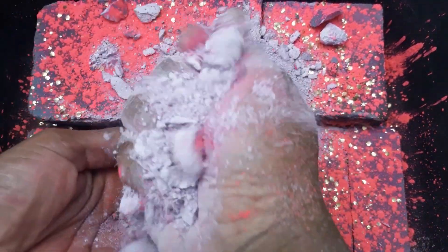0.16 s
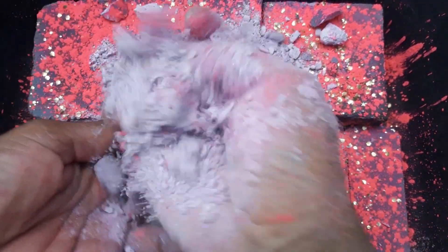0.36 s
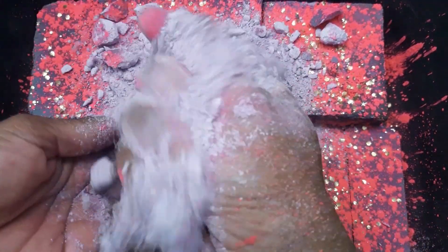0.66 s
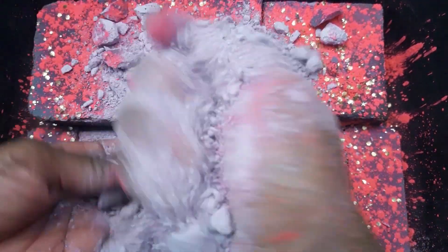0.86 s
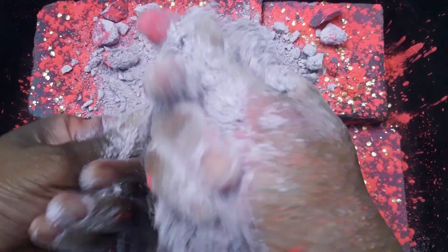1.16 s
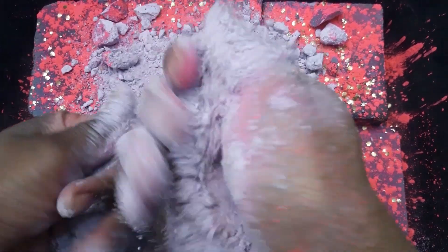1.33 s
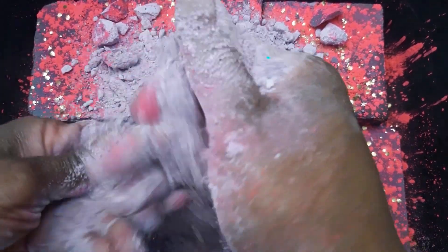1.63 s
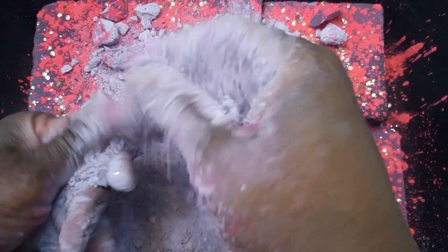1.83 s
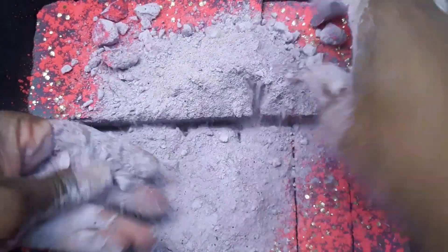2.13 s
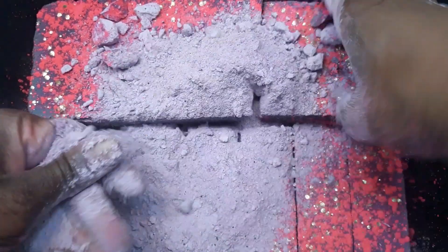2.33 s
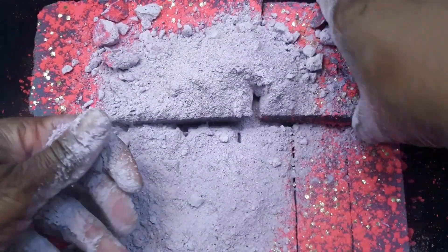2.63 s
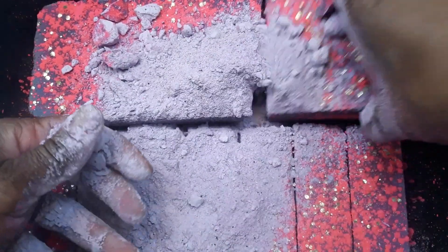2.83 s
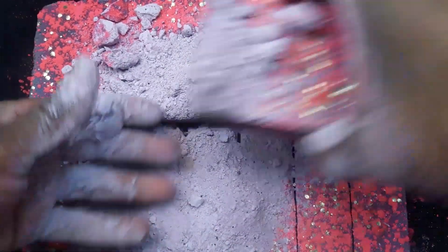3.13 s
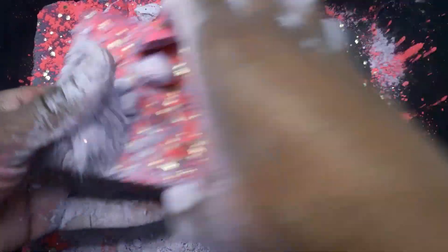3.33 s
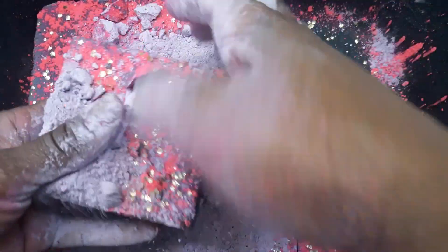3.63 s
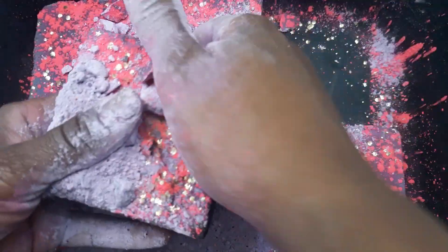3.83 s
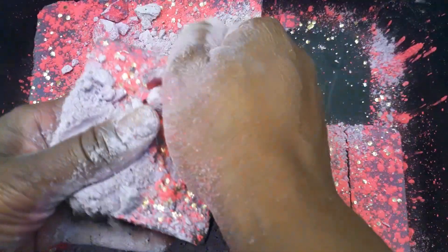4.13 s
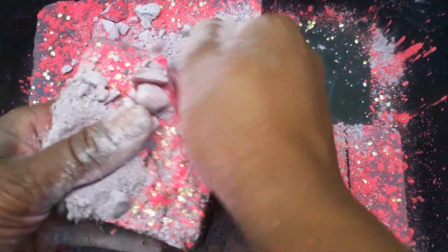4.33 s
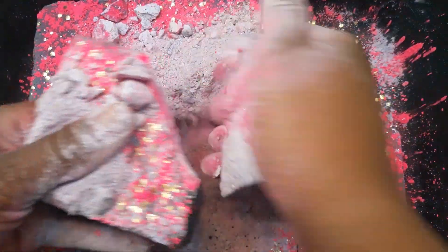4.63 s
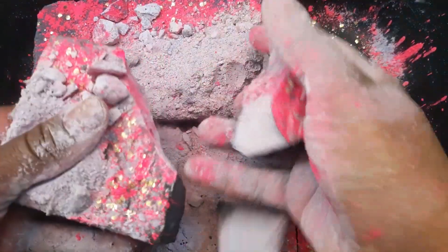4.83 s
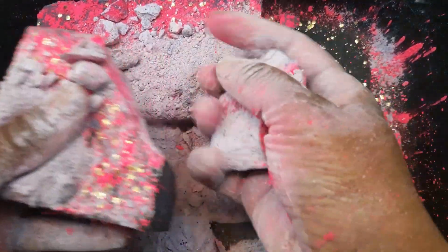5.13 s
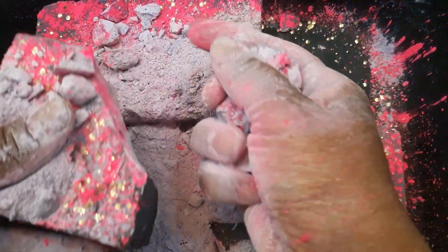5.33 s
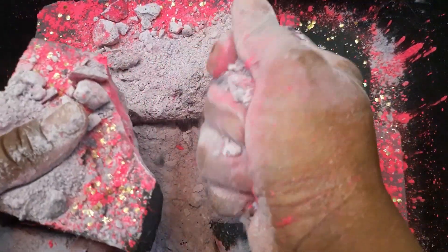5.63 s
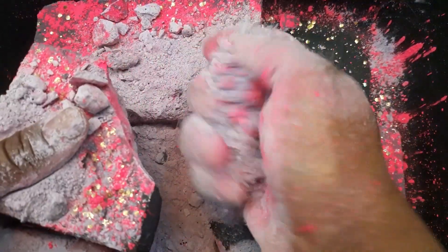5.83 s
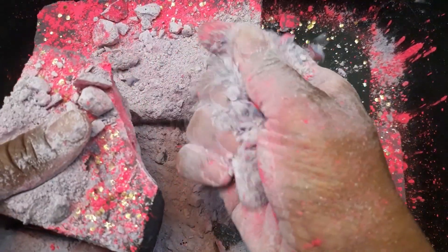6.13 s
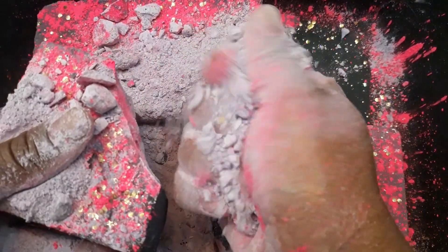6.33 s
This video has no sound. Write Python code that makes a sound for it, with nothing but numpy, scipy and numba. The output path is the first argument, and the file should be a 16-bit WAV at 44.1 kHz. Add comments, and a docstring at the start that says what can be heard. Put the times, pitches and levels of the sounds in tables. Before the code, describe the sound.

A close, dry capture in a quiet room with barely audible air and mains hum. From 0 s chalk is squeezed in the hands with small brittle snaps and gritty, crumbly rustle, swelling into a tight cluster of loud cracks and hollow knocks around 0.8-0.95 s. Scattered crumbling snaps and soft thumps continue to about 1.6 s, then thin to powdery rubbing. At 2.25-2.3 s lumps hit the tray with the heaviest low clunk and a coarse scrape. Tray rumble, short gritty drags and cracks follow until 3 s. From 3.2 to 4 s it is quiet, with faint dry scrapes. Crisp snaps burst at 4.2-4.3 s, then a lull. At 4.8 s crunching resumes, with irregular bright cracks from 5.2 to 5.7 s, a brief easing, then very sharp snaps at 6.07 and 6.2 s, and grit and smaller cracks to the end.

```python
"""Dry chalk bars snap, crush and crumble in the hands: noise pushed through resonances cracks, lumps knock.
Lumps thump the tray, whose decaying sines boom; uneven clicks over noise make grit, dust, crumb patter and rumble.
A dragged bar turns dense stick-slip clicks into wandering modes above a coarser crunch.
Shaped noise for room air and a wavering mains hum lie faintly underneath."""
import sys
import numpy as np
from scipy import signal
from scipy.fft import rfft, irfft
from scipy.io import wavfile
from scipy.ndimage import uniform_filter1d
from numba import njit

SR = 44100
rng = np.random.default_rng(int(sys.argv[2]) if len(sys.argv) > 2 else 0)


def pcm_store(signal):
    """Save signal as 16-bit PCM."""
    levels = np.round(np.clip(np.atleast_2d(signal), -1, 1) * 32767)
    wavfile.write(sys.argv[1], SR, levels.astype(np.int16).T)


N = 286209

# room air spectrum: f/Hz, gain/dB
AIR_SHAPE = [(15, -51.5), (25, -15), (135, -3), (388, -26), (875, -7), (1390, -27.5), (1550, -2),
             (1770, -37), (2330, -19), (4110, -15.5), (8560, -32.5), (15100, -30), (16400, -44)]
AIR_RMS_DB = -69.5
HUM_HZ, HUM_PEAK_DB = 120, -61  # hum level wavers about this

# steady working of the powder: t/s, grit/dB, fine dust/dB, crumb patter/dB, tray rumble/dB
STEADY_WORK = [(0.0, -46, -53, -34.5, -61), (0.23, -55, -66, -53.5, -51.5), (0.92, -45, -54.5, -43.5, -62),
               (2.04, -63.5, -73, -66, -57), (2.28, -50, -64, -63, -48), (2.44, -52, -89, -53, -32.5),
               (2.709, -76, -81, -53, -29), (2.86, -37.5, -68, -42, -42), (3.11, -77, -93, -76, -60.5),
               (3.89, -64.5, -60, -77, -67.5), (4.051, -48.5, -71, -54, -49), (4.23, -56.5, -73, -53, -52),
               (4.43, -61.5, -87, -84, -63), (4.59, -63.5, -75, -76, -65), (5.39, -47.5, -63, -51, -43.5),
               (5.87, -49, -68, -49.5, -42.5), (6.11, -45.5, -53.5, -43, -38), (6.49, -60, -70, -56, -47)]
# squeezes and shoves: peak t/s, rise/s, fall/s, grit/dB, fine dust/dB, crumb patter/dB, tray rumble/dB
SQUEEZES = [(0.03, 0.13, 0.1, -60, -66, -49, -30.5), (0.31, 0.035, 0.072, -47.5, -49, -55, -72),
            (0.43, 0.073, 0.11, -47, -55, -40.5, -43.5), (0.509, 0.048, 0.048, -37.5, -46.5, -41.5, -41),
            (0.689, 0.2, 0.033, -44, -60, -38, -40), (0.91, 0.11, 0.12, -33, -62, -38, -25),
            (1.1, 0.061, 0.2, -52, -75, -48, -47), (1.6, 0.32, 0.21, -51.5, -65, -44, -40),
            (1.732, 0.084, 0.2, -44, -52.5, -43.5, -63), (2.149, 0.3, 0.22, -46.5, -57.5, -49.5, -49),
            (2.296, 0.039, 0.16, -37.5, -50, -24, -17.5), (2.688, 0.1, 0.068, -41, -54, -38.5, -18),
            (2.855, 0.09, 0.056, -38, -41, -28.5, -33.5), (2.986, 0.036, 0.11, -42, -58, -39.5, -42),
            (3.382, 0.088, 0.31, -58.5, -53.5, -78, -72.5), (3.645, 0.11, 0.092, -81.5, -83, -46.5, -36),
            (4.035, 0.18, 0.22, -57, -58, -72, -67), (4.281, 0.05, 0.13, -57, -50, -40, -34),
            (4.392, 0.083, 0.064, -51.5, -55.5, -64.5, -45), (4.793, 0.0052, 0.043, -38, -56, -47, -27.5),
            (4.91, 0.032, 0.08, -47, -45, -38, -25.5), (5.66, 0.15, 0.07, -49, -53, -57, -56),
            (6.04, 0.36, 0.026, -47.5, -69, -62, -54), (6.214, 0.046, 0.16, -34.5, -60, -38, -41.5),
            (6.474, 0.084, 0.065, -38, -53, -39, -33)]
SWELL_DB = 20  # climb over the rise, drop over the fall
# rubbed grit spectrum: f/Hz, gain/dB
GRIT_SHAPE = [(1000, -26.5), (1700, -10.5), (1890, 1.5), (2320, 3), (3850, 4.5), (5120, 0.5), (6210, 0),
              (8000, -24), (10400, -44.5), (17600, -120)]
# fine dust spectrum: f/Hz, gain/dB
DUST_SHAPE = [(4120, -24.5), (7000, 1.5), (7930, 1), (12100, -18.5), (15200, -24), (16400, -44)]
# crumb patter spectrum: f/Hz, gain/dB
CRUMB_SHAPE = [(180, -25.5), (300, -11), (379, -16), (511, -2.5), (613, -7.5), (747, -10.5), (887, -15.5),
               (1480, -14), (1880, -24), (3380, -38.5), (5720, -120)]
# tray rumble spectrum: f/Hz, gain/dB
TRAY_SHAPE = [(15, -62), (25, -2), (64, -12), (84, 1), (120, -2.5), (173, 1), (200, 0), (252, -10.5),
              (333, -5), (375, -17.5), (450, -25), (580, -39.5), (990, -120)]

# lumps on the tray: t/s, peak/dB, boom f/Hz, ring T60/s (floored in thumps)
THUMPS = [(0.028, -29.5, 250, 0.11), (0.795, -10.5, 209, 0.036), (0.867, -10, 265, 0.049),
          (0.893, -6.5, 162, 0.12), (1.272, -22.5, 153, 0.15), (1.492, -25.5, 154.7, 0.17),
          (1.548, -13.5, 265, 0.043), (2.256, -15, 97, 0.12), (2.262, 0.5, 170, 0.08),
          (2.278, -5.5, 165, 0.12), (2.294, 0, 164, 0.069), (2.383, -12, 182, 0.11),
          (2.548, -15, 169.6, 0.13), (2.679, -23.5, 173, 0.44), (2.719, -20, 196.3, 0.21),
          (2.764, -20, 158, 0.13), (2.819, -23, 134, 0.11), (3.624, -26.5, 147, 0.15),
          (4.173, -29, 125, 0.045), (4.268, -12, 162, 0.0078), (4.793, -22.5, 122, 0.13),
          (4.892, -15, 249.4, 0.11), (5.215, -42.5, 145, 0.066), (5.265, -26, 108, 0.074),
          (5.329, -28.5, 91.5, 0.027), (5.378, -18.5, 118, 0.053), (5.411, -25, 114, 0.063),
          (5.527, -28, 124, 0.068), (5.855, -32.5, 170, 0.27), (6.053, -19.5, 113, 0.055)]

# fractures: t/s, fragment snap peak/dB, fragment f/Hz, lump knock/dB, brittle edge re snap/dB
CRACKS = [(0.0412, -16, 1340, -18, -34), (0.059, -25, 3670, -33, -24), (0.0861, -25.5, 3250, -36, -1),
          (0.3067, -30, 3850, -51, -24), (0.14, -30, 4000, -34, -24), (0.444, -22, 4000, -44, -24),
          (0.489, -14.5, 3000, -40, -27), (0.499, -17.5, 3800, -42, -13), (0.5092, -25.5, 1930, -32, -24),
          (0.55, -25, 1540, -55, -22), (0.6237, -24, 3700, -36, -26), (0.696, -35.5, 5600, -49, 0),
          (0.783, -22.5, 890, -26, -24), (0.8043, -27, 970, -16.5, -24), (0.823, -12.5, 5500, -29, -32),
          (0.8422, -17, 4050, -36, -19), (0.863, -4, 865, -13, -28), (0.866, 2, 1820, -13.5, -34),
          (0.8843, -3.5, 960, -16, -22), (0.9465, -30, 890, -24, 8), (1.0195, -19.5, 3650, -39, -31),
          (1.0763, -37, 2610, -36, -24), (1.0959, -29, 1550, -29, -24), (1.105, -29, 2600, -32, -24),
          (1.12, -23, 2410, -29.5, -24), (1.15, -23.5, 2360, -28, -2), (1.2572, -21, 3300, -34, -16),
          (1.2696, -25.5, 980, -61, 6), (1.3914, -26.5, 5530, -43, -3), (1.4057, -19, 1570, -21, -3),
          (1.478, -27, 1990, -27.5, -8), (1.512, -27, 1260, -28.5, -24), (1.5395, -20, 890, -11.5, -4),
          (1.562, -20, 940, -27.5, -31), (2.175, -27, 3520, -39, -21), (2.2473, -11, 1440, -41, -31),
          (2.6632, -22, 1280, -34, -28), (2.794, -18, 3760, -33, -3), (2.8013, -6.5, 2550, -29, -13),
          (2.882, -21, 5000, -50, -15), (2.937, -29.5, 1090, -37.5, -24), (2.961, -32, 4150, -55, -25),
          (2.9763, -17, 4300, -48, -36), (2.993, -15, 943, -41, -36.5), (3.2263, -36, 2960, -65.5, -26),
          (3.387, -30, 4960, -59, -25.5), (3.684, -29, 2660, -49, -20), (4.061, -19, 2600, -43.5, -12),
          (4.077, -26, 3500, -47, -26), (4.095, -16, 2820, -31, -16), (4.128, -23, 2870, -40, -26),
          (4.15, -26, 3010, -59, -24), (4.1807, -19.5, 2400, -46, -30), (4.2211, -6, 5730, -18.5, -17),
          (4.2238, -12.5, 4500, -21, -20), (4.2672, -3, 2730, -20, -3), (4.2877, -11.5, 3930, -27, -21),
          (4.5982, -49.5, 895, -45, -24), (4.79, -22, 3960, -46, -32), (4.8554, -29, 4100, -51, -27),
          (4.8622, -23.5, 4380, -53, -26), (4.8896, -24.5, 890, -18.5, 9.5),
          (4.8959, -12.5, 3620, -18.5, -24), (4.972, -27.5, 3140, -35, -27), (5.005, -28, 3630, -45, -17),
          (5.127, -28, 4870, -63, -27), (5.1668, -27, 6100, -48, -1), (5.2077, -19.5, 4670, -55, -20),
          (5.2167, -19.5, 4730, -36, -38), (5.2672, -9, 4250, -29.5, -14), (5.305, -28.5, 2400, -49, -13),
          (5.3348, -19.5, 3630, -57, -30), (5.3765, -7.5, 2280, -25, -35),
          (5.4072, -18.5, 1490, -28.5, -29), (5.4389, -13, 5700, -37, -27), (5.46, -23, 2200, -34.5, -22),
          (5.5395, -19.5, 2770, -29, -29), (5.5632, -21.5, 4530, -47, -24), (5.5778, -30, 2850, -36.5, -23),
          (5.6, -26, 2090, -56, -24), (5.6459, -8.5, 3900, -28, -15), (5.659, -12.5, 4230, -42, -45),
          (5.67, -19, 4600, -33.5, -30), (5.8555, -20.5, 850, -23.5, -28), (5.93, -26.5, 1320, -50, -27),
          (6.0528, -23, 1500, -29, -34), (6.0686, 0.5, 4660, -36, -22), (6.0816, -13, 4610, -50, -26),
          (6.099, -15, 3600, -28, -24), (6.1373, -12, 5200, -32.5, -3.5), (6.156, -26, 4500, -45, -24),
          (6.1756, 2, 3900, -16.5, -29), (6.2011, 1.5, 3760, -18, -29), (6.327, -9, 4540, -41, -32),
          (6.4063, -19, 3570, -32.5, -26), (6.4319, -12.5, 4400, -23.5, -34), (6.4494, -25, 2180, -52, -24),
          (6.458, -17, 3670, -43, -27), (6.4671, -15.5, 4010, -50, -35)]
# knock modes of a lump: f/Hz, width/Hz, level re knock/dB
LUMP_MODES = [(495, 101, -0.5), (640, 222, -1.5)]
# soft chalk radiates little extreme treble: f/Hz, gain/dB
CHALK_SHAPE = [(200, 3.5), (600, 2), (5000, -3), (7000, -8), (10000, -19.5), (14000, -42.5), (18000, -51.5)]
# fragment ring T60 at 2500 Hz, its fall with pitch, its random spread
RING_T60_S, RING_SLOPE, RING_SPREAD_DB = 0.017, 0.22, 2.5
KNOCK_T60_S, KNOCK_LAG_S = 0.02, 0.001988
EDGE_HZ, EDGE_WIDTH_HZ, EDGE_T60_S, EDGE_TOP_HZ = 4900, 3300, 0.011, 9400
# small fractures: weakest peak re grit gain, range above that, pitch limits
CRACKLE_PER_S, CRACKLE_DB, CRACKLE_SPREAD_DB = 130, 7, 6.5
CRACKLE_LOW_HZ, CRACKLE_HIGH_HZ = 1820, 6840
TAIL_T60_S, TAIL_DB = 0.19, -15.5

# dragged bar: start t/s, end t/s, rise/s, bar ring at start/dB, at end/dB,
# coarse crunch at start/dB, at end/dB, upper modes re ring/dB, pitch shift by the grip/semitones
SLIDES = [(1.702, 1.87, 0.034, -62, -59, -58, -58, 12, -0.1),
          (2.248, 2.346, 0.0015, -22.5, -33, -17, -29.5, -16.5, 0.9),
          (2.504, 2.644, 0.026, -48, -50, -36.5, -39.5, -7, 1.5),
          (2.658, 2.715, 0.015, -52, -46, -27, -32, -4, 3.2),
          (2.753, 2.876, 0.033, -33.5, -29, -33.5, -38.5, -3, 0.2),
          (3.28, 3.359, 0.053, -47.5, -51, -75, -74, -1.5, 1.1),
          (3.377, 3.424, 0.0053, -45, -62, -79, -57.5, 7.5, 2.4),
          (3.457, 3.49, 0.014, -44.5, -41.5, -55, -75, 1, 2.6),
          (3.526, 3.593, 0.022, -53, -69, -46, -54, -4, 3),
          (3.626, 3.699, 0.0038, -52, -55, -37, -59.5, -5, 1),
          (3.808, 3.876, 0.015, -50, -58.5, -74.5, -78, 5, 1),
          (3.858, 4.158, 0.027, -43.5, -45.5, -79, -57, 0.5, 0.8),
          (4.27, 4.426, .005, -42.5, -54.5, -41, -68, 8, 1.5),
          (4.697, 4.764, 0.014, -68, -69, -55, -62, 17, 2)]
# bar modes, lower four then upper: f/Hz, width/Hz, relative level/dB
BAR_MODES = [(1440, 100, -14.5), (2540, 220, 7), (3140, 360, -3), (3754, 230, 1), (4860, 4300, -2),
             (7740, 930, -6), (11400, 7700, -2.5)]
# coarse crunch modes: f/Hz, width/Hz, relative level/dB
CRUNCH_MODES = [(476, 580, 5.5), (700, 150, 6), (1380, 430, 2)]
SAG_SEMITONES_PER_S, WANDER_SEMITONES = 4.4, 0.6  # bar sinks as it beds in; each mode strays alone

MIC_LOW_HZ, TOP_HZ = 63, 16000


def undb(db):
    """Gain of a level in dB."""
    return 10 ** (np.asarray(db) / 20)


def level(x, db):
    """Scale to an rms level."""
    return undb(db) * x / np.sqrt(np.mean(x ** 2))


def colour(x, shape):
    """Minimum-phase filter through (Hz, dB) points: folded cepstrum of the log gain."""
    hz, db = np.transpose(shape)
    grid_hz = np.maximum(np.fft.rfftfreq(8192, 1 / SR), 1)
    gain_db = np.interp(np.log(grid_hz), np.log(hz), db)
    cepstrum = irfft(np.log(undb(gain_db)))
    cepstrum[1:4096] *= 2
    cepstrum[4097:] = 0
    impulse = irfft(np.exp(rfft(cepstrum)))
    return signal.fftconvolve(x, impulse)[:N]


def walk(rate_hz):
    """Random values at rate_hz, slewed linearly; spread near 1."""
    hold = int(SR / rate_hz)
    steps = np.repeat(rng.standard_normal(N // hold + 1), hold)
    return np.sqrt(3 / 2) * uniform_filter1d(steps, hold)[:N]


def grains(rate_hz, spread_db, smooth, patchy_db, patch_hz):
    """Random clicks of very uneven size over a smooth noise bed, coming in patches."""
    timing, size = rng.random((N, 2)).T
    size_db = spread_db * np.minimum(-np.log(1 - size), 4.5)
    clicks = (timing < rate_hz / SR) * undb(size_db) * np.sign(rng.standard_normal(N))
    bed = smooth * rng.standard_normal(N)
    return (level(clicks, 0) + bed) * undb(patchy_db * walk(patch_hz))


def ring_out(n, t60_s):
    """Exponential decay: time axis and 60 dB envelope over n samples."""
    t = np.arange(n) / SR
    return t, np.exp(-np.log(1000) * t / t60_s)


def burst(noise, hz, width_hz, t60_s, snap):
    """One sharp snap and decaying splinter noise drive a resonance; peak 1."""
    push = noise * ring_out(len(noise), max(t60_s, .002))[1]
    push[0] = snap * np.sign(noise[0])
    y = signal.lfilter(*signal.iirpeak(min(hz, .4 * SR), hz / width_hz, fs=SR), push)
    return y / np.max(np.abs(y))


def add(out, s, y):
    """Mix a sound in at time s."""
    i = int(s * SR)
    out[i:i + len(y)] += y[:N - i]


def room():
    """Still air as shaped noise, plus a wavering mains hum."""
    hum_gain = undb(HUM_PEAK_DB + 3.1 * walk(22))
    hum = hum_gain * np.sin(2 * np.pi * HUM_HZ * np.arange(N) / SR)
    return level(colour(rng.standard_normal(N), AIR_SHAPE), AIR_RMS_DB) + hum


def effort():
    """Gains of grit, dust, crumbs and rumble: squeeze powers add to the steady working."""
    t = np.arange(0, N / SR, .001)
    s, *columns = np.transpose(STEADY_WORK)
    power = np.array([undb(np.interp(t, s, db)) ** 2 for db in columns])
    for peak, rise, fall, *db in SQUEEZES:
        away = np.maximum((peak - t) / max(rise, .003), (t - peak) / max(fall, .003))
        power += np.outer(undb(db) ** 2, undb(-SWELL_DB * away) ** 2)
    return [np.interp(np.arange(N) / SR, t, np.sqrt(p)) for p in power]


def grit(rub):
    """Crumbs of six sizes break apart: each grain stream rings briefly at its own pitch, over the rub."""
    out = 1.4 * rub
    for hz in 1900 * 1.3 ** np.arange(6):
        stream = grains(300, 4.2, 0.5, 3.5, 70)
        out = out + 3.6 * signal.lfilter(*signal.iirpeak(hz, 3.5, fs=SR), stream)
    return colour(out, GRIT_SHAPE)


def handling(grit_gain, dust_gain, crumb_gain, tray_gain):
    """Powder rubs as grit and dust, crumbs patter, and the tray rumbles under the hands."""
    rub = grains(1500, 4.5, 0.5, 4.5, 60)
    # the finest dust hisses more evenly than the grit that sheds it
    dust = colour(0.98 * rub + rng.standard_normal(N), DUST_SHAPE)
    crumbs = colour(grains(400, 1.9, 0.84, 1.7, 40) + 0.5 * rub, CRUMB_SHAPE)
    rumble = colour(grains(70, 2.2, 0.51, 1.5, 17), TRAY_SHAPE)
    powder = grit_gain * level(grit(rub), 0) + dust_gain * level(dust, 0)
    return powder + crumb_gain * level(crumbs, 0) + tray_gain * level(rumble, 0)


def thumps():
    """A soft push sets the tray's low mode and a weaker upper one swinging."""
    out = np.zeros(N)
    for s, db, hz, t60_s in THUMPS:
        t, decay = ring_out(SR // 3, max(t60_s, .01))
        phase = 2 * np.pi * rng.random()
        modes = np.sin(2 * np.pi * hz * t) + 0.25 * np.sin(2 * np.pi * 1.75 * hz * t + phase)
        y = (1 - np.exp(-t / 0.0011)) ** 2 * decay * modes
        add(out, s, undb(db) * y / np.max(np.abs(y)))
    return out


def fractures():
    """Each fracture rings a fragment, splinters broadly, then knocks the lump; brittle edge kept apart."""
    out, edge = np.zeros(N), np.zeros(N)
    for s, db, hz, knock_db, edge_db in CRACKS:
        noise = rng.standard_normal((5, 3000))
        t60_s = RING_T60_S * (hz / 2500) ** -RING_SLOPE * undb(RING_SPREAD_DB * rng.standard_normal())
        fragment = burst(noise[0], hz, 0.5 * hz, t60_s, 3.61)
        splinters = burst(noise[1], np.sqrt(4800 * hz), 6900, 1.2 * t60_s, 5.2)
        add(out, s, undb(db) * (fragment + 0.48 * splinters))
        add(edge, s, undb(db + edge_db) * burst(noise[4], EDGE_HZ, EDGE_WIDTH_HZ, EDGE_T60_S, 2.6))
        for (lump_hz, width_hz, lump_db), push in zip(LUMP_MODES, noise[2:4]):
            knock = burst(push, lump_hz, width_hz, KNOCK_T60_S, 1.1)
            add(out, s + KNOCK_LAG_S, undb(knock_db + lump_db) * knock)
    return out, edge


def crackle(grit_gain):
    """Smaller crumbs break at random times, as hard as the powder is worked."""
    out = np.zeros(N)
    for when, pitch, size in rng.random((int(CRACKLE_PER_S * N / SR), 3)):
        hz = CRACKLE_LOW_HZ * (CRACKLE_HIGH_HZ / CRACKLE_LOW_HZ) ** pitch
        gain = grit_gain[int(when * N)] * undb(CRACKLE_DB + CRACKLE_SPREAD_DB * size ** 2)
        y = burst(rng.standard_normal(800), hz, 1.3 * hz, 0.36 * RING_T60_S, 4.6)
        add(out, when * N / SR, gain * y)
    return out


def cracks(grit_gain):
    """Fractures and crackle, smeared by splinters and near surfaces; the brittle edge stays dry."""
    out, edge = fractures()
    out += crackle(grit_gain)
    t, decay = ring_out(SR // 4, TAIL_T60_S)
    tail = rng.standard_normal(len(t)) * decay * (1 - np.exp(-t / 0.0032))
    tail /= np.sqrt(np.sum(tail ** 2))
    out = out + undb(TAIL_DB) * signal.fftconvolve(out, tail)[:N]
    return colour(out, CHALK_SHAPE) + signal.lfilter(*signal.butter(2, EDGE_TOP_HZ, fs=SR), edge)


@njit
def band(x, hz, k):
    """State-variable band-pass with a moving centre; k is width over centre."""
    y, b, l = np.empty(len(x)), 0., 0.
    for i in range(len(x)):
        g = np.tan(np.pi * hz[i] / SR)
        v = (b + g * (x[i] - l)) / (1 + g * (g + k))
        b, l, y[i] = 2 * v - b, l + 2 * g * v, k * v
    return y


def resonate(x, modes, shift_semitones, flicker_db, flicker_hz):
    """Ring doubled band-passes; each swells and strays on its own as the contact wanders."""
    out = 0
    for hz, width_hz, db in modes:
        stray = shift_semitones + WANDER_SEMITONES * walk(flicker_hz)
        centre_hz = hz * 2 ** (stray / 12)
        gain = undb(db + flicker_db * walk(flicker_hz))
        once = band(x, centre_hz, width_hz / hz)
        out = out + gain * band(once, centre_hz, width_hz / hz)
    return out


def slides():
    """Dense stick-slip under a dragged bar rings its modes; coarser lumps crunch lower down."""
    t = np.arange(N) / SR
    ring, upper, crunch, shift = np.zeros((4, N))
    for start, end, rise, ring_db0, ring_db1, crunch_db0, crunch_db1, upper_db, grip in SLIDES:
        touch = np.clip((t - start) / rise, 0, 1) * np.clip((end - t) / 0.012 + 1, 0, 1)
        bar = touch * undb(np.interp(t, [start, end], [ring_db0, ring_db1]))
        ring += bar
        upper += bar * undb(upper_db)
        crunch += touch * undb(np.interp(t, [start, end], [crunch_db0, crunch_db1]))
        shift = np.where(touch > 0, grip - SAG_SEMITONES_PER_S * (t - start), shift)
    slip = grains(2500, 2.5, 0.8, 2.5, 90)
    low = colour(resonate(slip, BAR_MODES[:4], shift, 2, 35), CHALK_SHAPE)
    high = colour(resonate(slip, BAR_MODES[4:], shift, 2, 35), CHALK_SHAPE)
    dragged = (ring * low + upper * high) / np.std(low + high)
    coarse = resonate(grains(1200, 3.2, 0.8, 1.0, 42), CRUNCH_MODES, 0, 3, 33)
    return dragged + crunch * level(colour(coarse, CHALK_SHAPE), 0)


def scene():
    """Sum of all sources at the microphone, one channel."""
    gains = effort()
    return (room() + handling(*gains) + thumps() + cracks(gains[0]) + slides())[None]


def record(dry):
    """The microphone drops deep bass, clips at full scale, then cuts the top."""
    heard = signal.lfilter(*signal.butter(2, MIC_LOW_HZ, "high", fs=SR), dry)
    top_cut = signal.ellip(10, .2, 100, TOP_HZ, fs=SR, output="sos")
    return signal.sosfilt(top_cut, np.clip(heard, -1, 1))


dry = scene()
out = record(dry)
pcm_store(out)
```